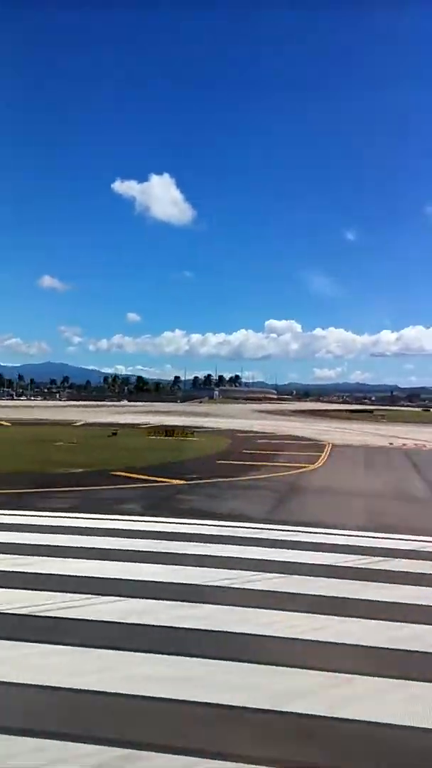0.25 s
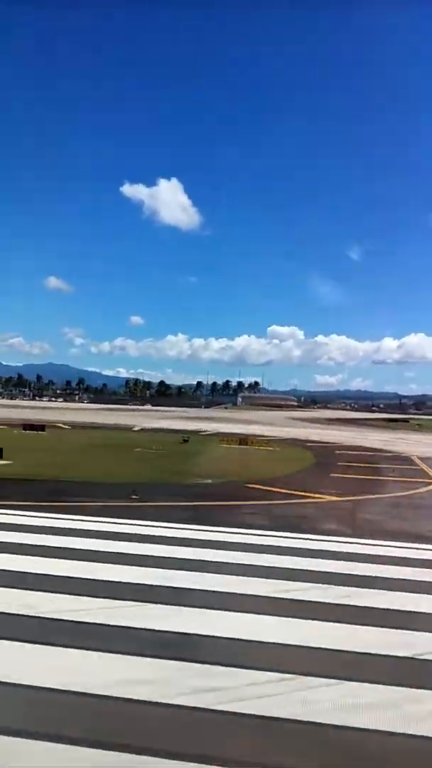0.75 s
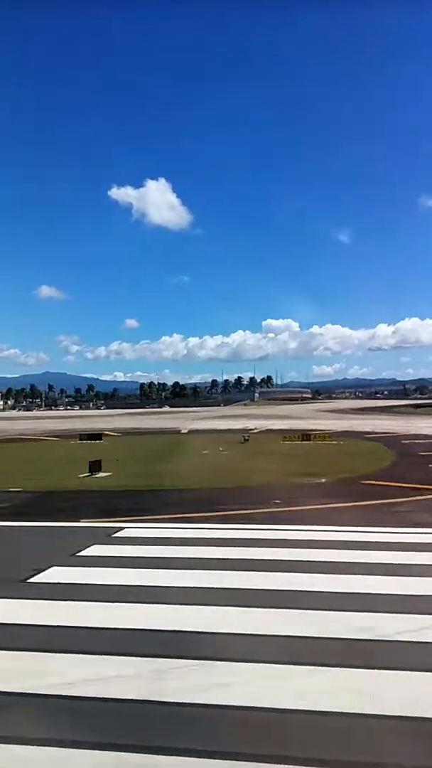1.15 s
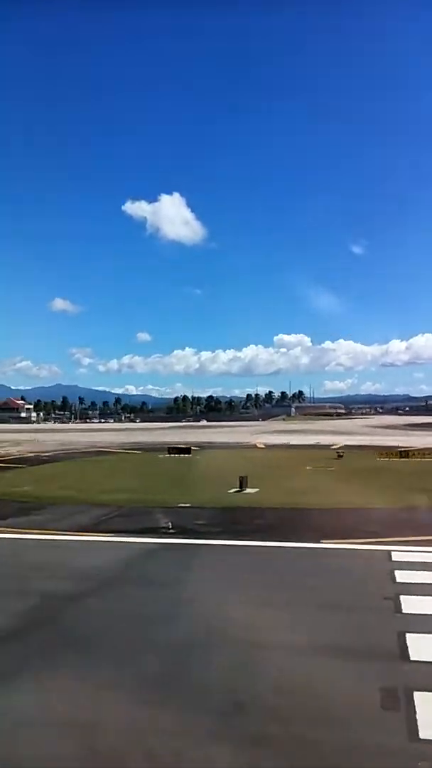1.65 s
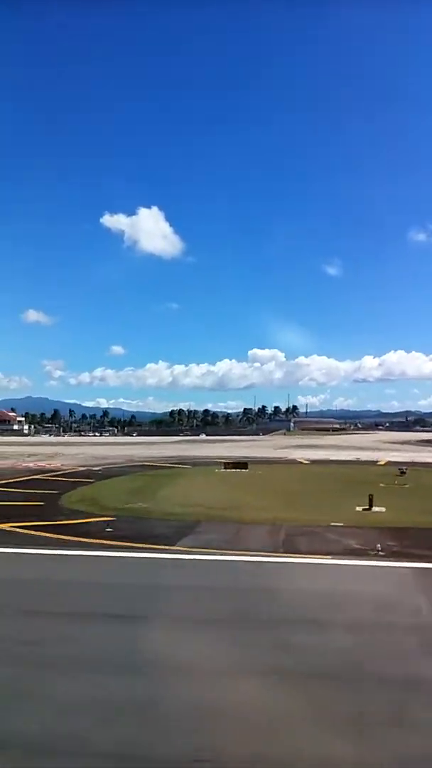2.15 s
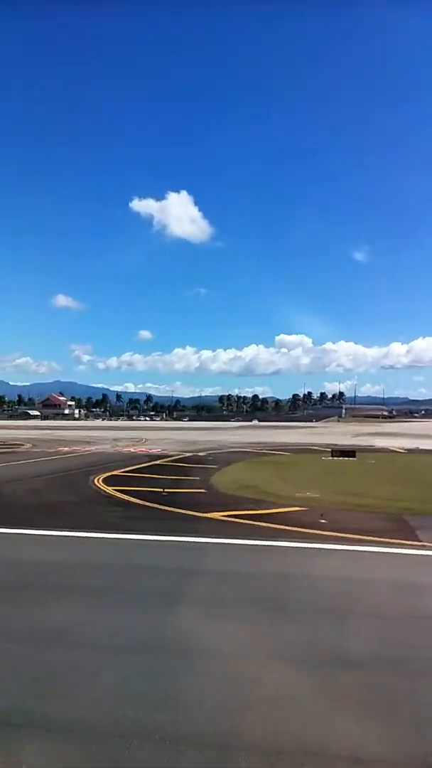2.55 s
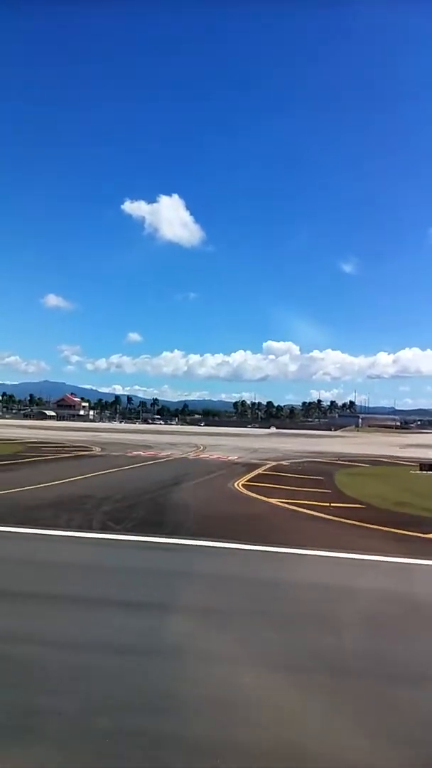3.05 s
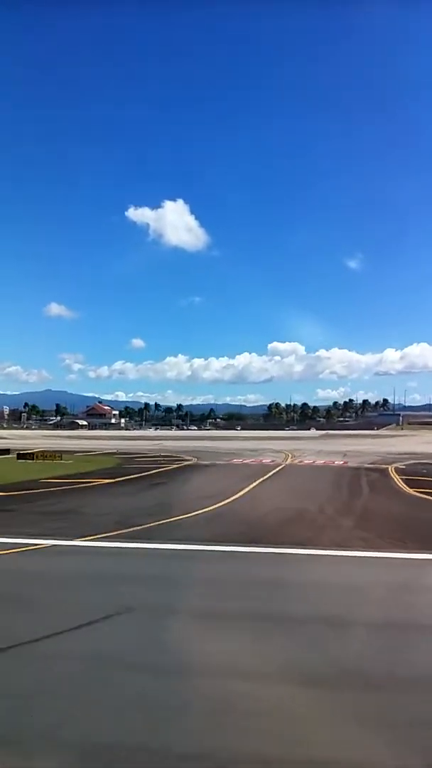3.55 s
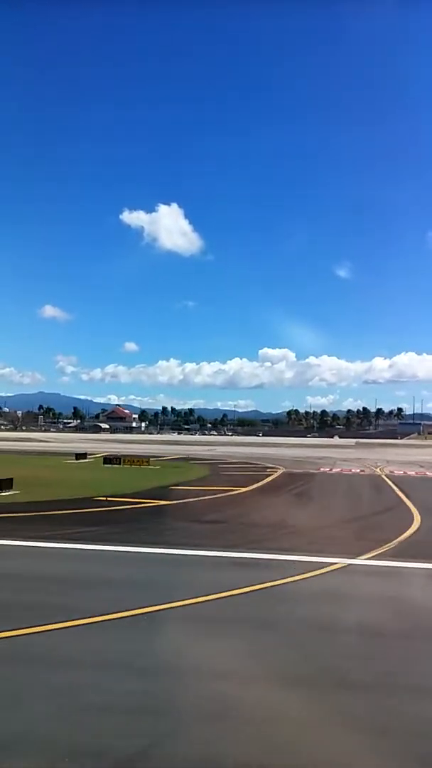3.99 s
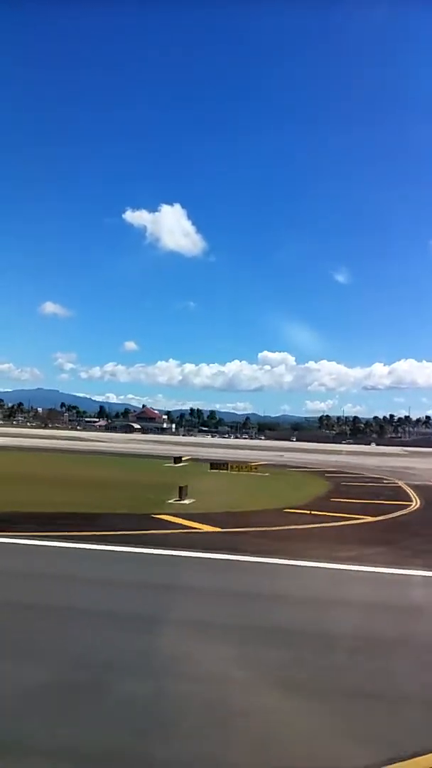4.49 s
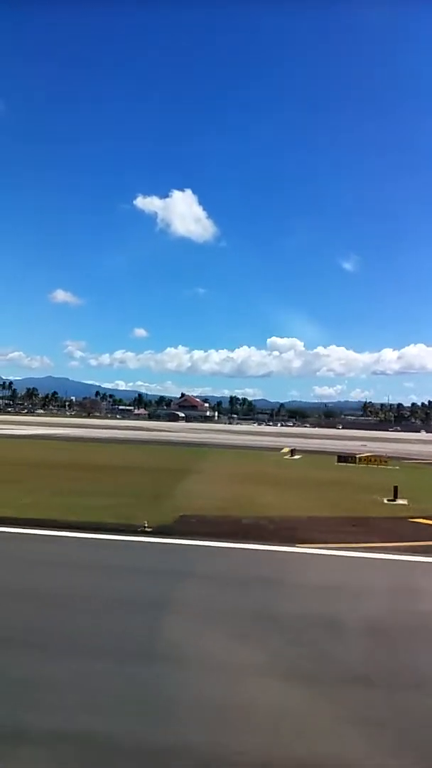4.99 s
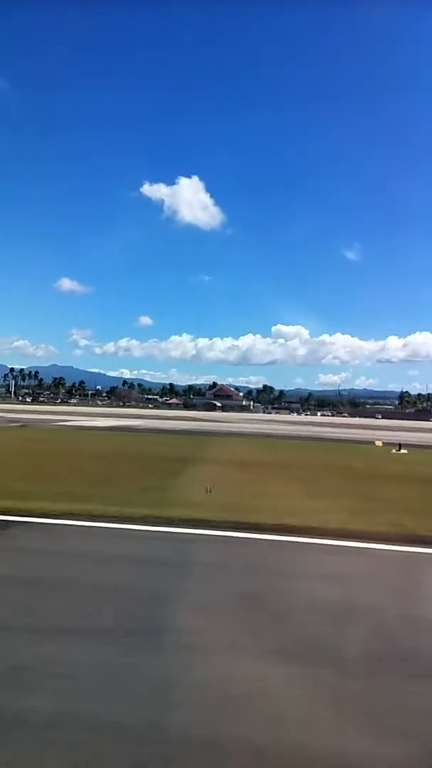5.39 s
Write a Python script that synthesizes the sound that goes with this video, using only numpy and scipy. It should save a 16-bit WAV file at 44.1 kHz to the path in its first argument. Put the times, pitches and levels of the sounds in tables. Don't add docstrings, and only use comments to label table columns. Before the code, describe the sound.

From 0 s a loud jet roar fills an airliner cabin as the plane rolls for takeoff, coming through the wall as dense low and mid noise. A small microphone is driven to its limit, so the roar arrives in hard, chopped bursts: irregular dropouts of a few hundredths of a second, with rapid crackling chatter and fluttering between them. The breaks are heaviest in the first 1.3 s. A thin, wavering fan whine, high and slightly rough, lies under the roar, swelling around 2 s, easing near 2.8 s as the roar dips slightly, then returning by 3.6 s and holding. Two very faint dry panel ticks fall at about 0.6 and 1.2 s, mostly buried. A sharper trim snap with a short ring comes at 4.3 s. After about 4 s the dropouts shorten and the roar becomes more continuous, still rough and distorted, running unbroken to the cut at 5.6 s.

```python
import sys
import numpy as np
from scipy import signal
from scipy.fft import rfft, irfft
from scipy.io import wavfile

SR = 44100
rng = np.random.default_rng(int(sys.argv[2]) if len(sys.argv) > 2 else 0)


def amplitude_ratio(level_db):
    exponent = np.asarray(level_db, float) / 20
    return 10 ** exponent


def wav_record(signal):
    frames = np.transpose(np.atleast_2d(signal))
    bounded = np.clip(frames, -1, 1)
    quanta = np.round(bounded * 32767).astype(np.int16)
    wavfile.write(sys.argv[1], SR, quanta)


N = 248283

# t/s, fan whine f/Hz, whine level/dB, roar level/dB
ENGINES = [
    (0, 1908, -39.5, -7.5),
    (1.2, 1916, -37.5, -7.5),
    (2, 1937, -33, -8),
    (2.8, 1924, -37, -9.5),
    (3.601, 1940, -34, -8.5),
    (4.401, 1942, -32.5, -8.5),
    (5, 1945, -33, -8.5),
    (5.63, 1947, -32, -8.5),
]
# f/Hz, density/dB per Hz
ROAR_SPECTRUM = [(20, 8.5), (60, 17.5), (120, 5), (240, 4), (320, -2), (420, -7), (780, -16), (980, -23),
                 (1700, -29), (2500, -32), (5700, -42.5), (7700, -51), (9400, -84.5), (16000, -77.5)]
# t/s, peak level/dB, f/Hz, t60/s
PANEL_TICKS = [
    (.6346, -40, 10500, .0045),
    (1.1818, -39, 10500, .012),
    (4.3225, -26, 5860, .014),
    (4.327, -30, 5000, .12),
]
# t/s, length/ms
GUSTS = [(0, 38), (0.0662, 43), (0.1312, 47), (0.2747, 23.6), (.4866, 24.2), (0.5241, 51.4),
         (.59, 41.1), (.6375, 54), (.7041, 27.5), (0.7711, 27.5), (.909, 25.3), (1.0087, 26.7),
         (1.1863, 40), (1.2508, 40.6), (1.6099, 25.7), (1.6725, 36), (1.7116, 33.5), (1.9373, 25.3),
         (2.145, 27.5), (2.1972, 25.4), (2.2624, 26.5), (2.588, 32.5), (2.8565, 25.6), (2.9078, 31),
         (2.9535, 43.5), (3.056, 39.5), (3.3118, 39.4), (3.3951, 22.9), (3.5839, 27), (3.7527, 23.5),
         (.0421, 9), (.4153, 15.6), (0.8051, 17.2), (1.0626, 14.2), (1.14, 9.07), (1.7464, 9),
               (2.0349, 15), (2.3084, 9.7), (2.4909, 18), (2.702, 14.3), (2.7199, 17), (3.2951, 14.5),
               (3.374, 15.4), (3.428, 19.3), (3.6516, 15.1), (3.6683, 17.3), (3.9393, 13.8), (4.3043, 9),
               (4.3473, 12.7), (4.4424, 8.8), (4.539, 12), (4.6228, 16.6), (4.6547, 19.2), (4.7728, 12.5),
               (4.8229, 8), (5.0887, 14), (5.138, 9), (5.2491, 14.6), (5.3872, 18.2), (5.5203, 10)]
# t/s, bounces/count, spacing/ms, length/ms
CHATTER = [(0.1846, 3, 18, 7.4), (.304, 2, 27, 8.5), (0.732, 2, 12, 11.4), (0.8728, 2, 14, 11.5),
           (1.078, 3, 12.3, 6.9), (1.1549, 2, 14.5, 12), (1.2325, 2, 11.5, 5.8), (1.294, 2, 19, 13),
           (1.3635, 2, 17.2, 11), (1.4153, 3, 29, 6.46), (1.576, 2, 11.3, 10.15), (1.796, 3, 29.8, 7.1),
           (1.882, 4, 12.8, 10), (1.989, 3, 15, 8.2), (2.0833, 3, 18.2, 10), (2.385, 4, 22.3, 10.8),
           (2.5276, 3, 16.3, 14.1), (2.6334, 3, 10.3, 6.1), (2.764, 3, 15.5, 13.9), (3.012, 2, 14.2, 10.5),
           (3.1825, 2, 20.2, 15), (3.2358, 2, 20.4, 17.2), (3.501, 2, 17, 8.6), (3.6944, 2, 38.5, 9.9),
           (3.794, 3, 25.6, 9.2), (3.974, 2, 15.2, 8.3), (4.1533, 3, 18.4, 8.5), (4.2124, 4, 13.5, 7.8),
           (4.718, 2, 18.4, 8.2), (4.9432, 4, 14.7, 7.2)]

BRIGHTNESS_DB_PER_OCT = 2.36
WHINE_SKIRT_HZ, WHINE_SKIRT_DB = 193, -6
CORE_HZ, CORE_WIDTH_HZ, CORE_DB = 7875, 60., -72
FLUTTER_EVERY_S, FLUTTER_LONGEST_MS = .017, 6
FLUTTER_MS, FLUTTER_FADE_MS_PER_S = 3.6, .3
REBOUND_MS = 4
GRAZE_SPREADS = 1.9
SWING_PER_S = 60.
SELF_NOISE_DB = -88.5
PORT_CUT_HZ, WIND_CUT_HZ, RUMBLE_CUT_HZ = 212, 130, 30.5
CROSSOVER_HZ, CROSSOVER_WIDTH_HZ = 4000, 130
CUTOFF_HZ = 15950


def rms_one(x):
    return x / np.sqrt(np.mean(x ** 2) + 1e-20)


def drift(rate_hz):
    r = np.exp(-2 * np.pi * rate_hz / SR)
    noise = rng.standard_normal(N + SR)
    settled = signal.lfilter([1], [1, -2 * r, r * r], noise)[SR:]
    return rms_one(settled)


def resonance(x, hz, width_hz):
    r = np.exp(-np.pi * width_hz / SR)
    zeros = np.array([1, 0, -1]) * (1 - r * r) / 2
    poles = [1, -2 * r * np.cos(2 * np.pi * hz / SR), r * r]
    return signal.lfilter(zeros, poles, x)


def low_cut(x, hz, order):
    return signal.sosfilt(signal.butter(order, hz, "high", fs=SR, output="sos"), x)


def roar(level_db):
    hz = np.maximum(np.fft.rfftfreq(N, 1 / SR), 10)
    knots_hz, knots_db = np.transpose(ROAR_SPECTRUM)
    colour_db = np.interp(np.log(hz), np.log(knots_hz), knots_db)
    spectrum = rfft(rng.standard_normal(N)) * amplitude_ratio(colour_db) * (hz > 15)
    octave = np.clip(np.log2(hz / 250), -3, 6)
    together = drift(9.0)
    out = np.zeros(N)
    for k in range(-3, 7):
        share = np.clip(1 - np.abs(octave - k), 0, 1)
        flicker_db = 0.66 * together + 1.38 * drift(10.6)
        bright_db = BRIGHTNESS_DB_PER_OCT * max(k - 4, 0)
        out += amplitude_ratio(flicker_db + bright_db) * irfft(spectrum * share, N)
    audible = irfft(spectrum * (hz > 150), N)
    return amplitude_ratio(level_db) * out / audible.std()


def whine(pitch_hz, level_db):
    phase = 2 * np.pi * np.cumsum(pitch_hz + 1.9 * drift(5.3)) / SR
    tone = np.sqrt(2) * np.sin(phase) * amplitude_ratio(2.5 * drift(18.0))
    skirt = rms_one(resonance(rng.standard_normal(N), np.mean(pitch_hz), WHINE_SKIRT_HZ))
    core = resonance(rng.standard_normal(N), CORE_HZ, CORE_WIDTH_HZ)
    core = rms_one(resonance(core, CORE_HZ, CORE_WIDTH_HZ))
    fan = tone + amplitude_ratio(WHINE_SKIRT_DB) * skirt
    return amplitude_ratio(level_db) * fan + amplitude_ratio(CORE_DB) * core


def ticks():
    out = np.zeros(N)
    age_s = np.arange(SR // 20) / SR
    for t_s, peak_db, hz, t60_s in PANEL_TICKS:
        burst = resonance(rng.standard_normal(len(age_s)), hz, hz * 0.31)
        burst = rms_one(resonance(burst, hz, hz * 0.31))
        at = round(t_s * SR)
        out[at:at + len(age_s)] += burst * amplitude_ratio(peak_db - 60 * age_s / t60_s)
    return out


def scene():
    t_s, *columns = np.transpose(ENGINES)
    pitch_hz, whine_db, roar_db = [np.interp(np.arange(N) / SR, t_s, c) for c in columns]
    return (roar(roar_db) + whine(pitch_hz, whine_db) + ticks())[None]


def stops():
    bounces = []
    for t_s, count, spacing_ms, length_ms in CHATTER:
        for k in range(round(count)):
            bounces.append((t_s + k * spacing_ms / 1000, length_ms))
    gusts = np.vstack([GUSTS, bounces]).astype(float)
    chance = rng.random((int(N / SR / FLUTTER_EVERY_S), 2))
    t_s = (np.arange(len(chance)) + chance[:, 0]) * FLUTTER_EVERY_S
    mean_ms = FLUTTER_MS - FLUTTER_FADE_MS_PER_S * t_s
    length_ms = np.minimum(1 - mean_ms * np.log(1 - chance[:, 1]), FLUTTER_LONGEST_MS)
    since_ms = (t_s[:, None] - gusts[:, 0]) * 1000
    overlaps = (since_ms > -length_ms[:, None]) & (since_ms < gusts[:, 1] + REBOUND_MS)
    clear = ~np.any(overlaps, axis=1)
    return np.vstack([gusts, np.transpose([t_s, length_ms])[clear]])


def overload(x):
    crests = low_cut(x, 90., order=1)
    free = np.abs(crests) < GRAZE_SPREADS * crests.std()
    for t_s, length_ms in stops():
        free[round(t_s * SR):round((t_s + length_ms / 1000) * SR)] = False
    edges = np.flatnonzero(np.diff(free, prepend=False, append=False)).reshape(-1, 2)
    swing, side = np.zeros(N), np.sign(drift(6.0))
    for start, end in edges:
        swing[start:end] = side[start] * np.linspace(1, -1, end - start)
    slope = np.diff(x, prepend=0) + swing * SWING_PER_S / SR
    return np.cumsum(slope * free)


def self_noise():
    return amplitude_ratio(SELF_NOISE_DB) * signal.lfilter([1], [1, -.9], rng.standard_normal(N))


def band_limit(x):
    return signal.sosfilt(signal.butter(12, 18000, fs=SR, output="sos"), x)


def record(dry):
    x = overload(dry[0]) + self_noise()
    x = low_cut(x, PORT_CUT_HZ, order=1)
    x = low_cut(x, WIND_CUT_HZ, order=2)
    x = x - 2 * resonance(x, CROSSOVER_HZ, CROSSOVER_WIDTH_HZ)
    x = 1.056 * np.tanh(x / 1.03)
    x = low_cut(x, RUMBLE_CUT_HZ, order=6)
    x = signal.sosfilt(signal.ellip(10, .5, 40, CUTOFF_HZ, fs=SR, output="sos"), x)
    return band_limit(x[None])


dry = scene()
out = record(dry)
wav_record(out)
```